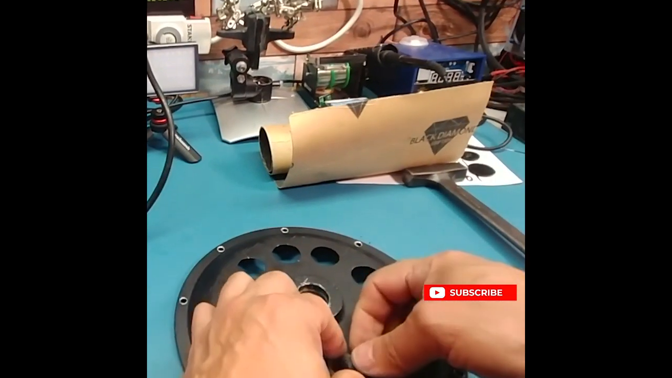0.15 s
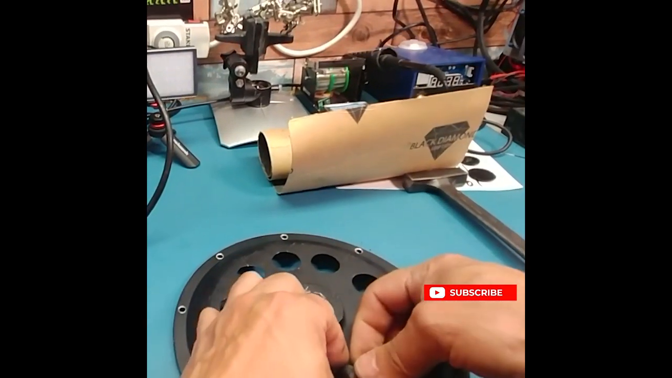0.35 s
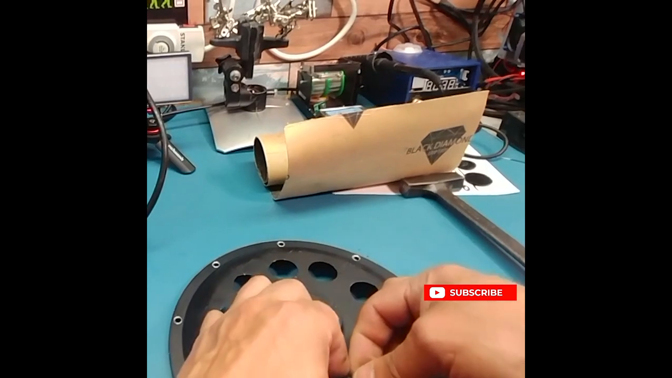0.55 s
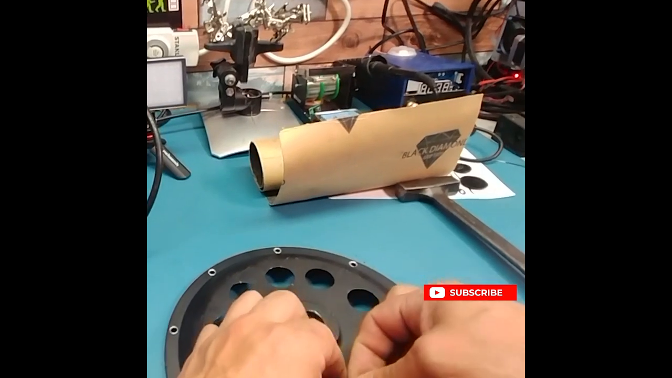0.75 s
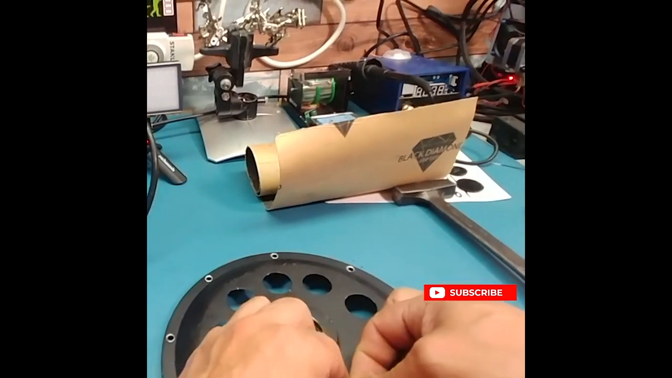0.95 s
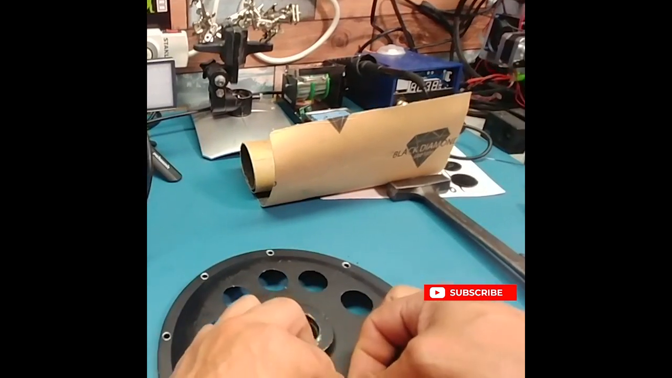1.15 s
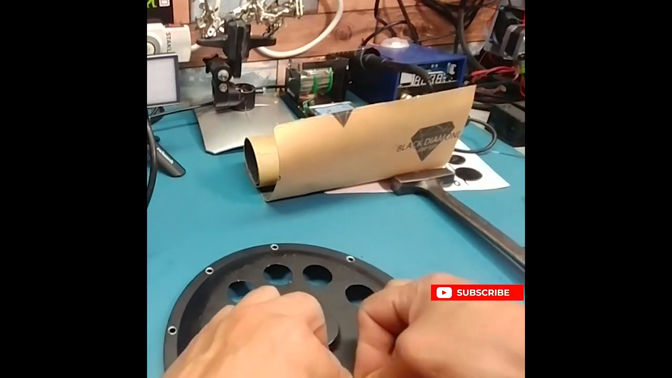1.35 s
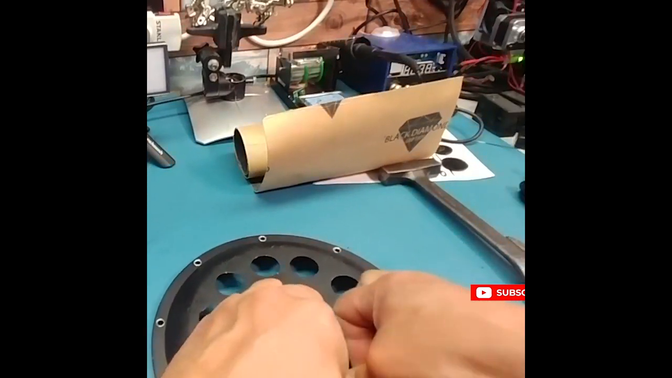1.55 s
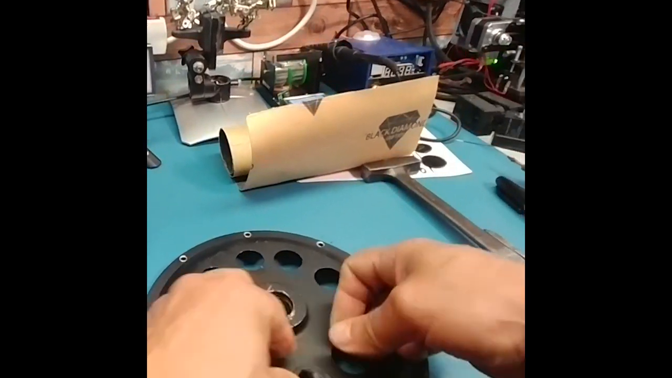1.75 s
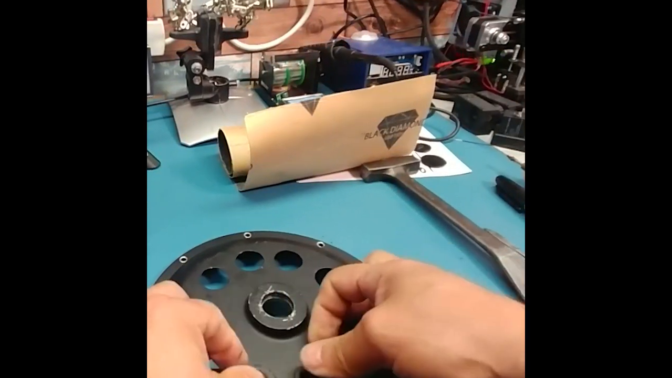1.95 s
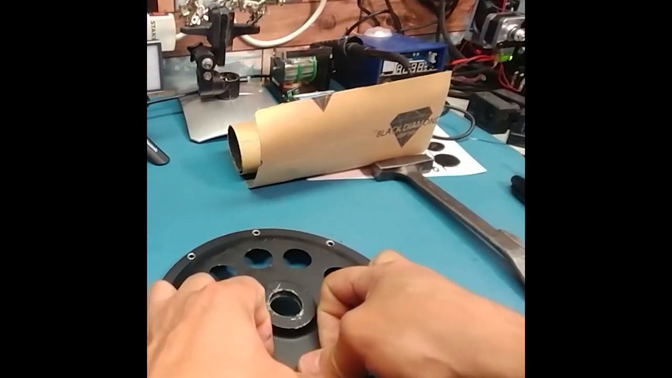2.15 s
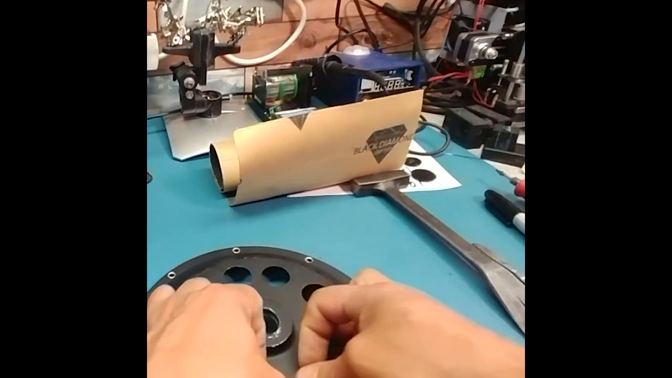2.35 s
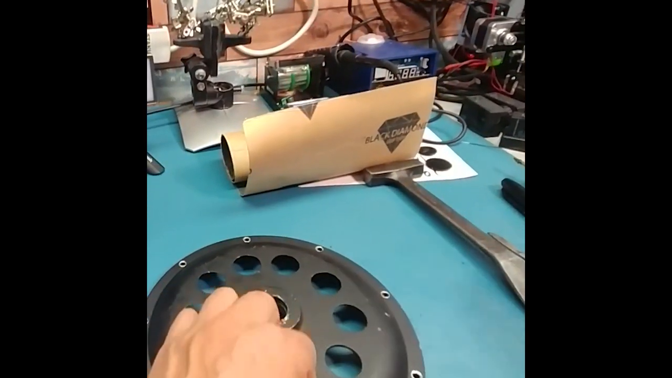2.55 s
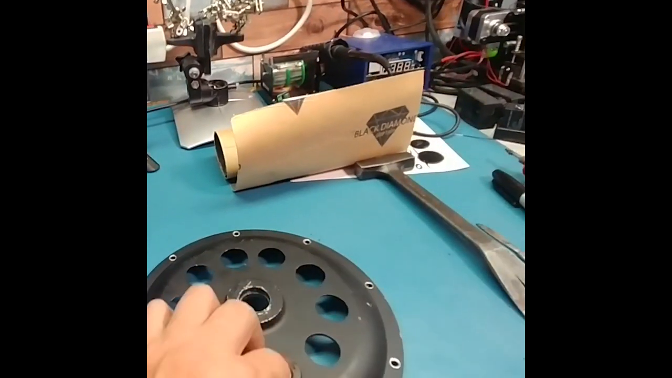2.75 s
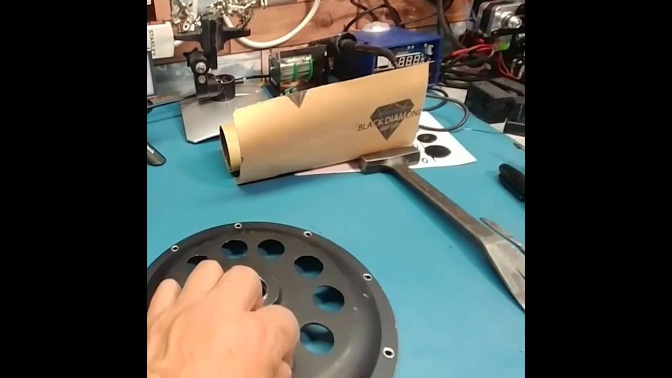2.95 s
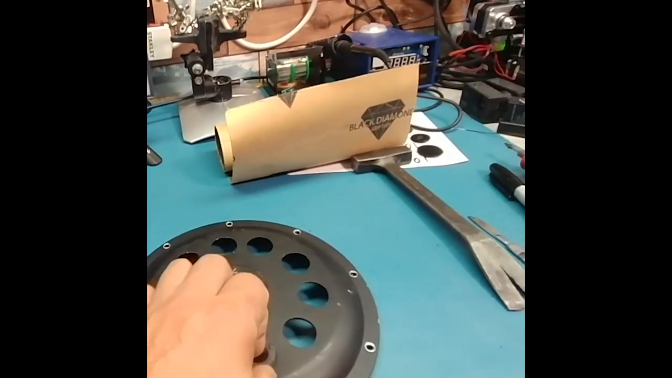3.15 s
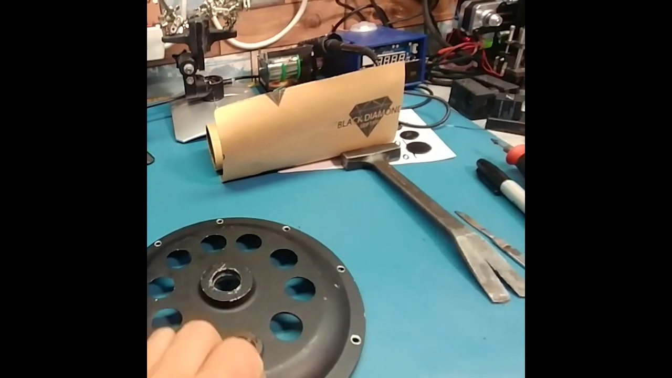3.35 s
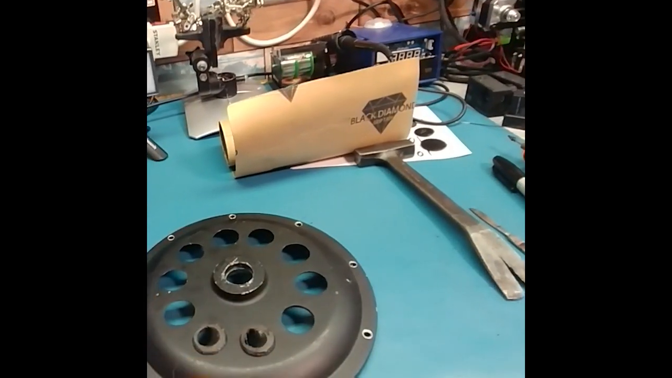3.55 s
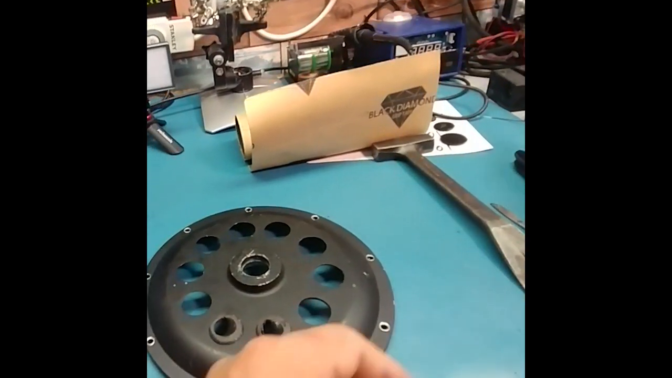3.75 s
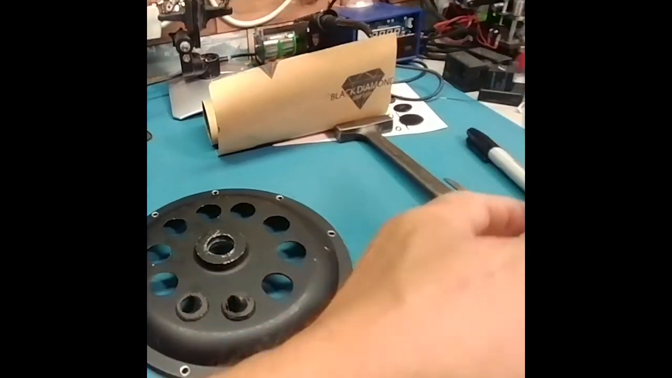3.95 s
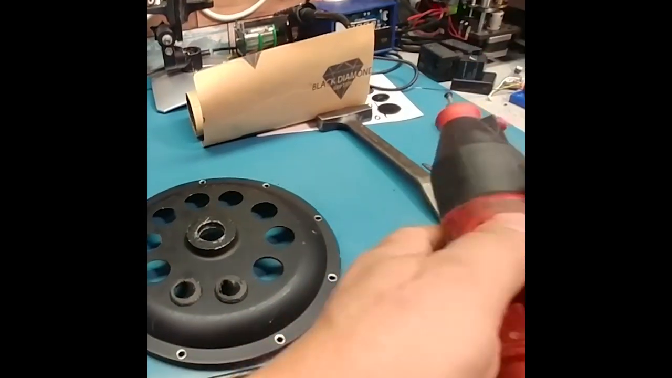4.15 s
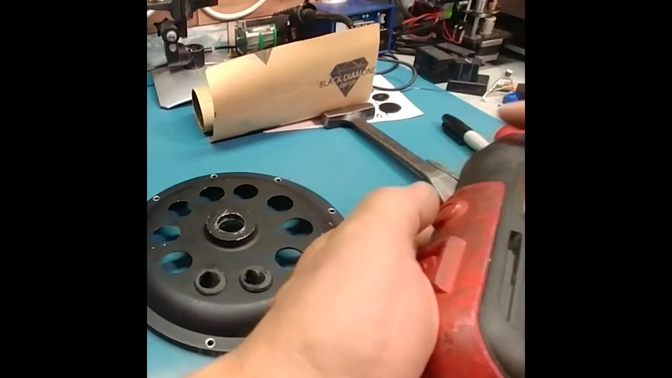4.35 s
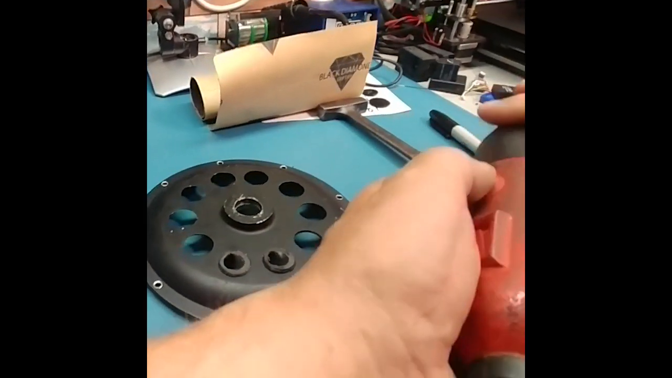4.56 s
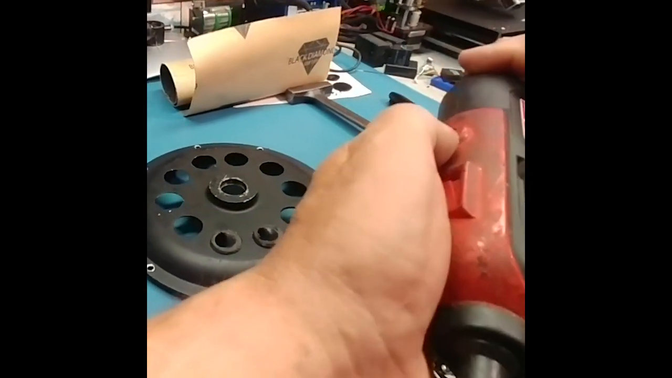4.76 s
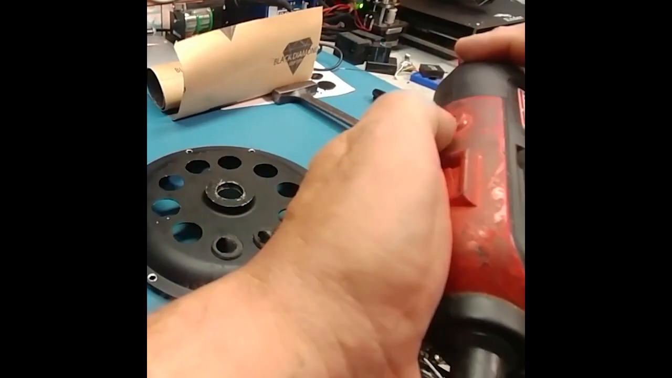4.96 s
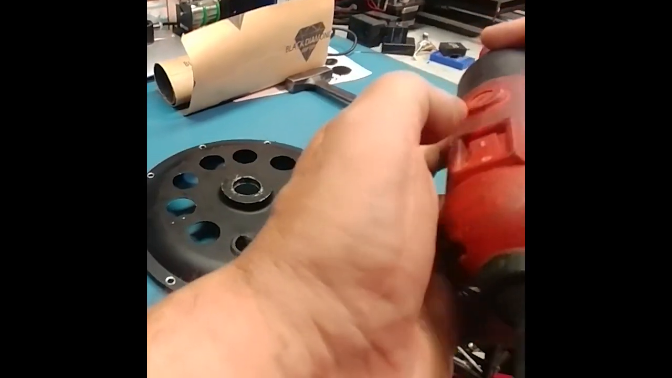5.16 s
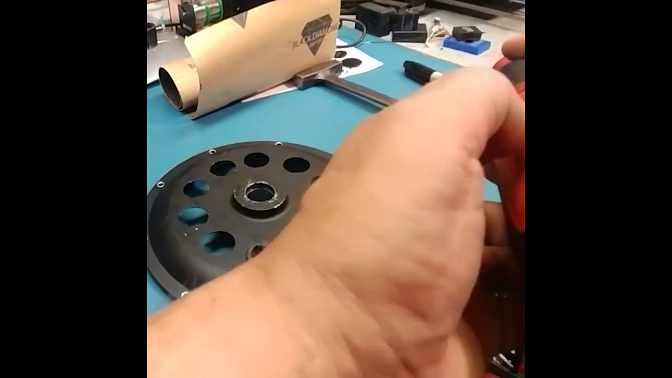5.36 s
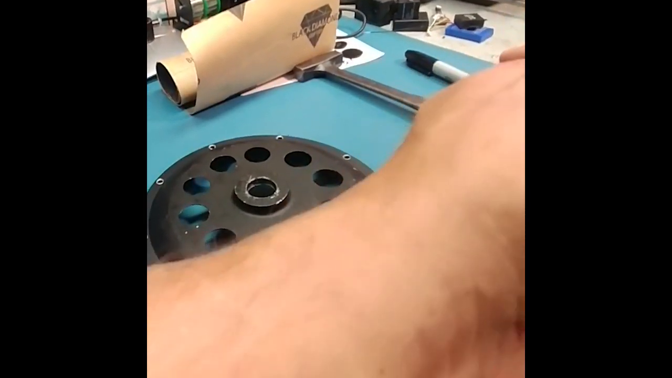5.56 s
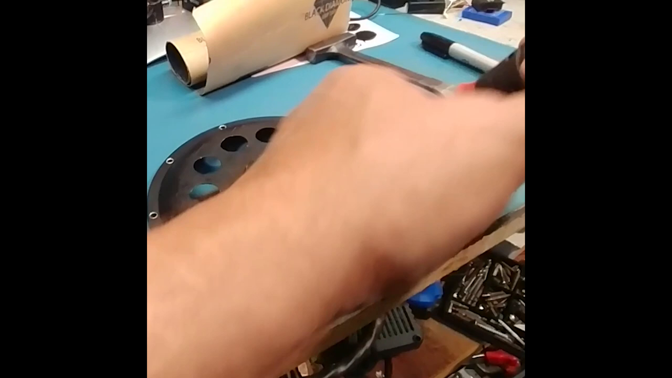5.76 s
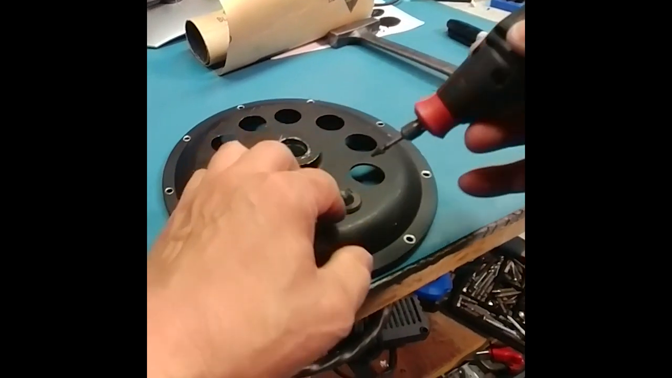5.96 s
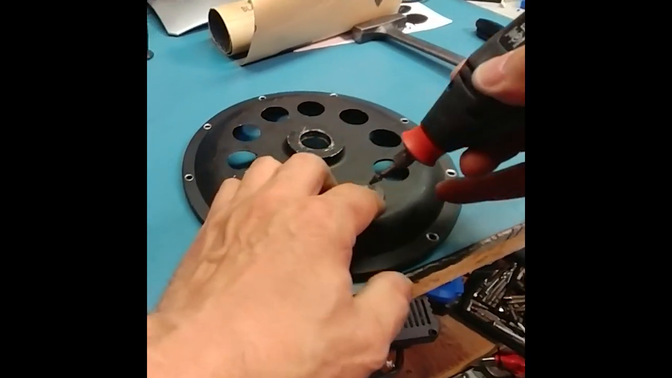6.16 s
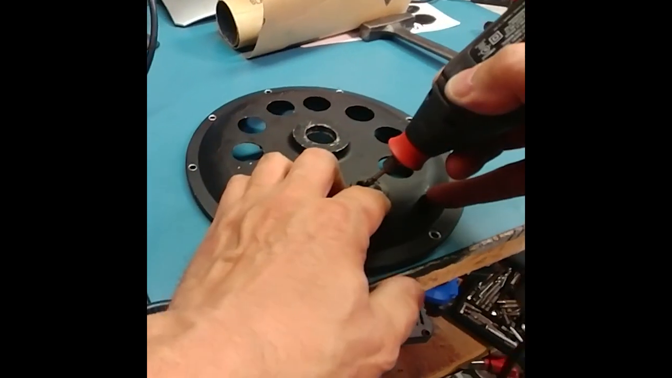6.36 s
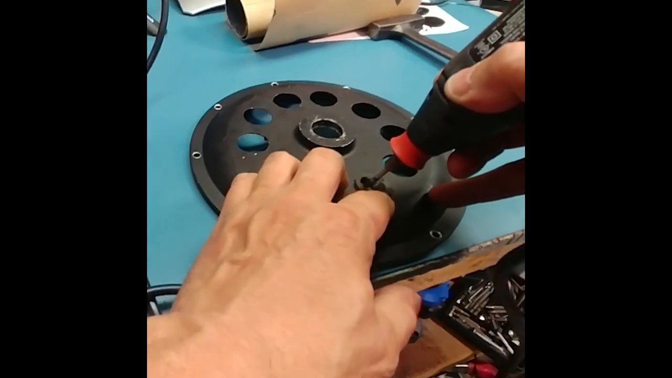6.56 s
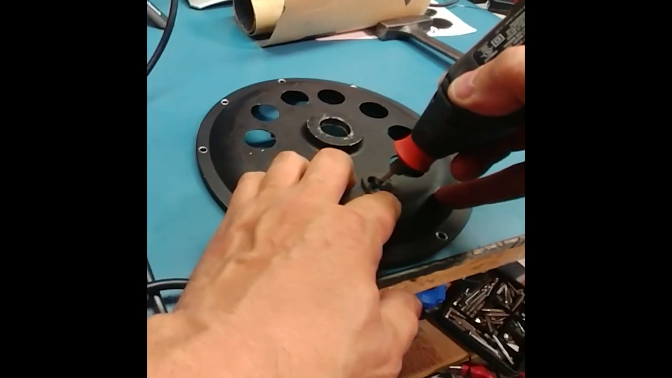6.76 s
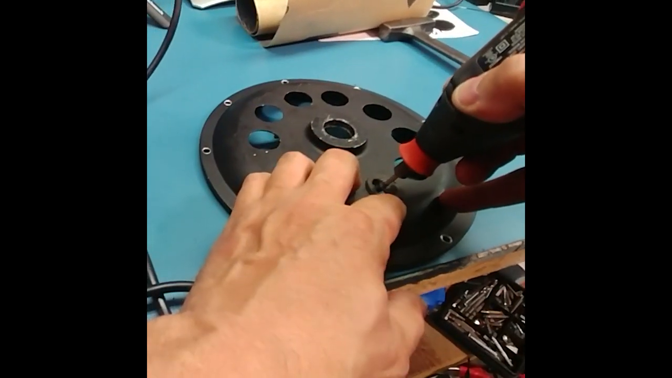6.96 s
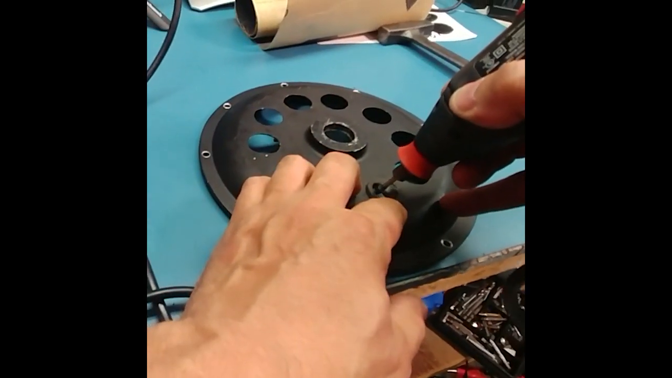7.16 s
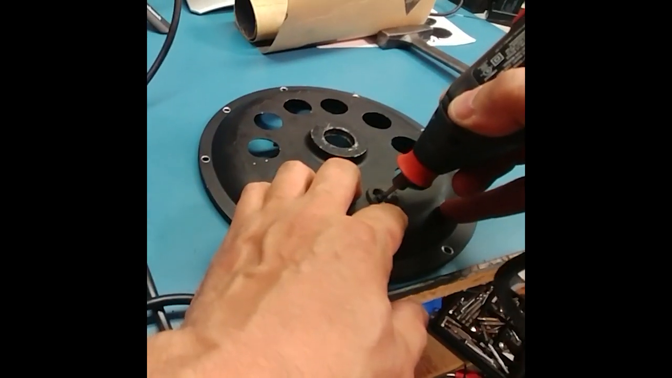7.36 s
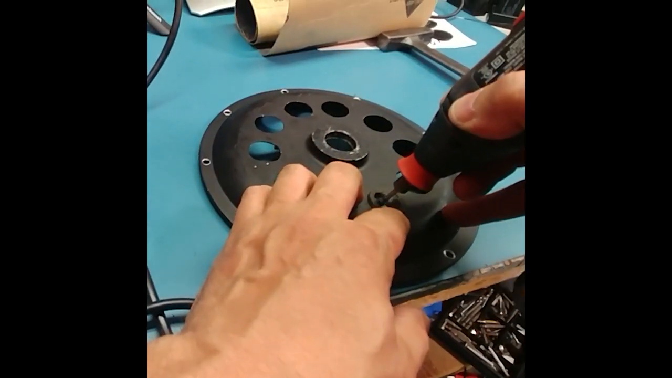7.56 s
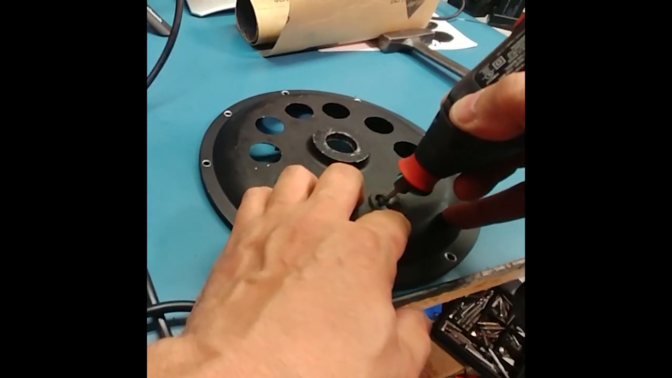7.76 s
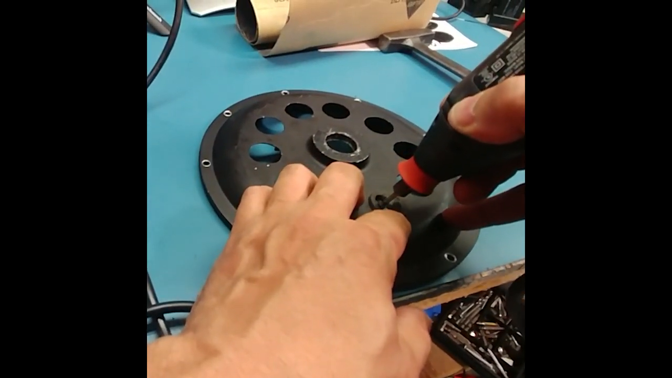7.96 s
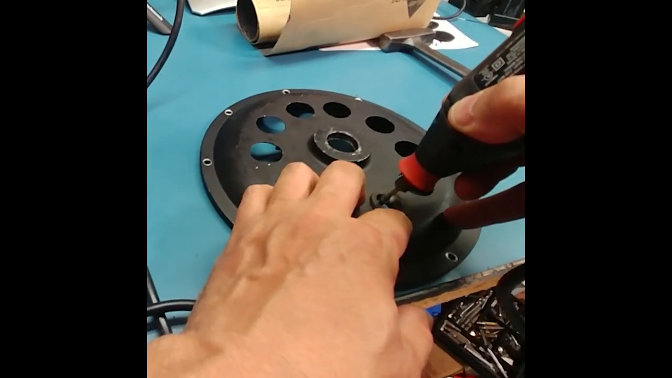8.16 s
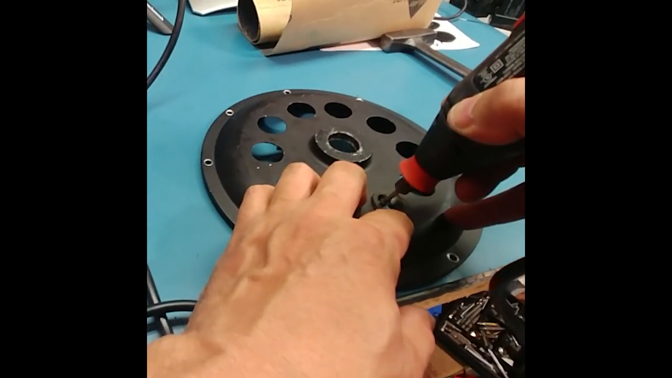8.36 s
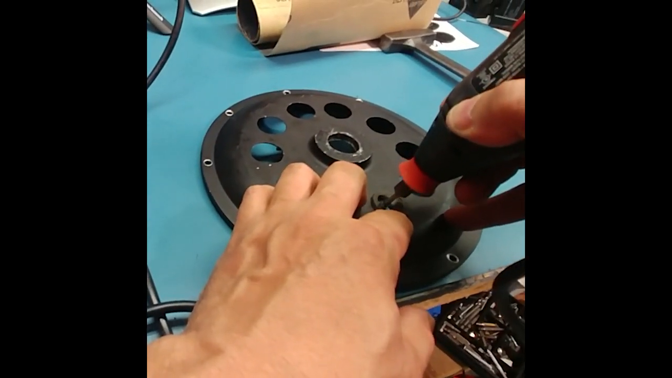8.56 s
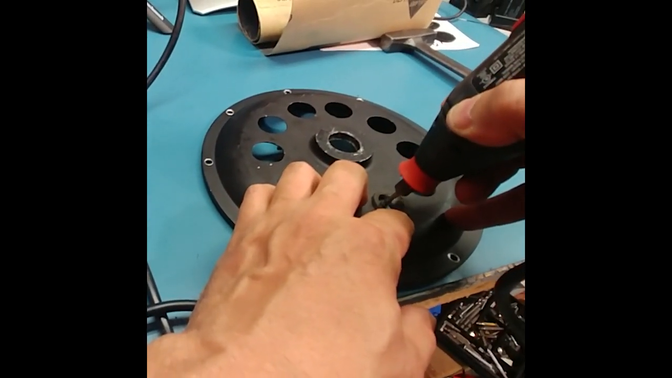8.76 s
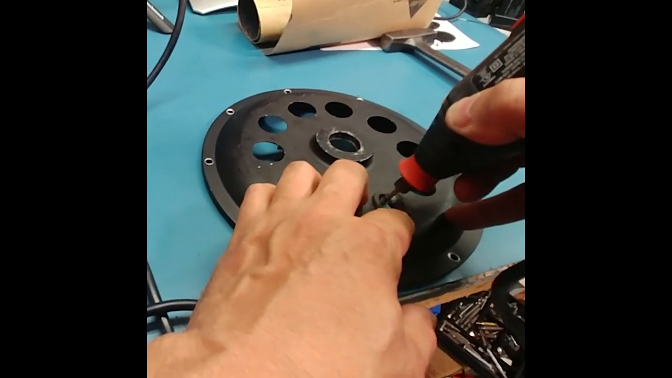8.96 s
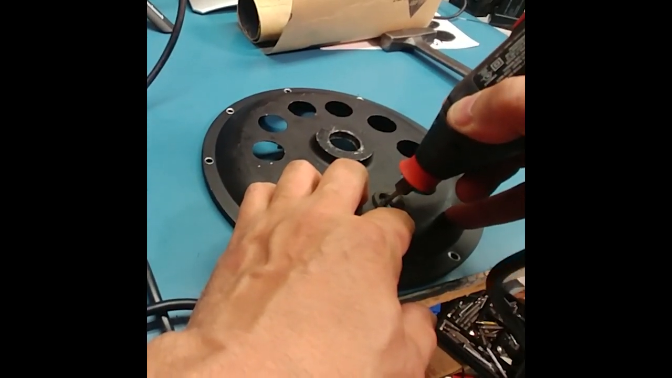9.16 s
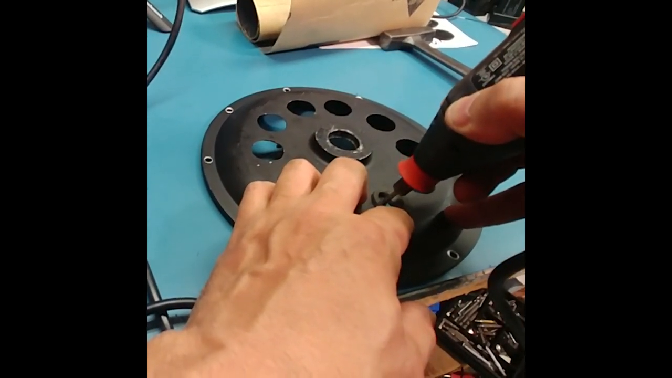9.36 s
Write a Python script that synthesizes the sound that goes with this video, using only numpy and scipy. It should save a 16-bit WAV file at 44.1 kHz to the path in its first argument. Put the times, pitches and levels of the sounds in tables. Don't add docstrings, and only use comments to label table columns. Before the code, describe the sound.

A small workshop hums softly with low ventilation, and a power supply whistles thinly and steadily. Close by, fingers scuff a plastic disc from the start; light knocks come at 0.8 s, firmer ones with dull bench bumps at 1.1-1.3 s, and a very loud cracking snap with a short rattle at 1.55 s. Brighter rubs and smaller knocks gather at 2.2-3.2 s, then a palm thud at 3.3 s, a faint tap near 3.65 s and sparse brushing until 5.2 s. A bump at 5.4 s precedes a sharp switch click at 5.5 s. The rotary tool whirs up steeply, with a low cable thump near 5.8 s, slowing its climb by 7 s into a loud, steady, throbbing whine full of fan air. The bit touches briefly at 6.7 s, then from 7 s grates and sings in irregular bites, still running at the end, about 9.4 s.

```python
import sys
import numpy as np
from scipy import signal
from scipy.fft import rfft, irfft, next_fast_len
from scipy.io import wavfile
from scipy.ndimage import uniform_filter1d, map_coordinates

SR = 44100
rng = np.random.default_rng(int(sys.argv[2]) if len(sys.argv) > 2 else 0)


def to_linear_factor(level_db):
    exponent = np.asarray(level_db, float) / 20
    return 10 ** exponent


def dump(signal):
    limited = np.clip(np.atleast_2d(signal).T, -1, 1)
    pcm = np.round(limited * 32767).astype(np.int16)
    wavfile.write(sys.argv[1], SR, pcm)


N = 414981
TIME = np.arange(N) / SR
BURST = TIME[:SR // 2]
MAINS = np.exp(2j * np.pi * 120 * TIME)
TOP_SPEED_HZ = 430
FINGERS_PAN_DB = 7


def level(x, db):
    return x * to_linear_factor(db) / np.sqrt(np.mean(x ** 2))


def noise(n=N):
    return rng.standard_normal(n)


def colour(x, points):
    hz, db = np.transpose(points)
    size = next_fast_len(len(x))
    f = np.fft.rfftfreq(size, 1 / SR)
    gain = to_linear_factor(np.interp(np.log(f + 1), np.log(hz), db))
    return irfft(rfft(x, size) * gain, size)[:len(x)]


def peak(x, hz, width_hz):
    return signal.lfilter(*signal.iirpeak(min(hz, .45 * SR), hz / width_hz, SR), x)


def walk(rate):
    k = int(SR / rate)
    steps = np.repeat(noise(N // k + 1), k)
    return 1.293 * uniform_filter1d(uniform_filter1d(steps, k), k)[:N]


def decay(t60_s):
    return to_linear_factor(-60 * BURST / t60_s)


def gate(start, end, edge_s):
    return np.clip(np.minimum(TIME - start, end - TIME) / edge_s, 0, 1)


def pan(x, db):
    return np.array([x * to_linear_factor(db / 2), x * to_linear_factor(-db / 2)])


def place(x, pan_db, lag):
    late = map_coordinates(x, [np.arange(N) - lag], order=3)
    return np.array([late * to_linear_factor(pan_db / 2), x * to_linear_factor(-pan_db / 2)])


def add(out, x, s):
    i = int(s * SR)
    out[:, i:i + x.shape[1]] += x


# f/Hz, level/dB per Hz
VENTILATION = [(25, -32.5), (50, -2.5), (150, 3), (185, -18), (275, 1.5), (430, -13), (800, -14.5),
               (1200, -25.5), (1700, -33), (2000, -47.5), (4500, -44.5), (7000, -64), (8300, -59),
               (9600, -85.5), (10800, -115)]
# f/Hz, width/Hz, level/dB
HUM_BANDS = [(59.5, 2.4, -44), (145.8, 13.3, -45.5), (236.5, 9.1, -52.5), (276, 4, -45.5)]


def workshop():
    def layer():
        air = level(colour(noise(), VENTILATION), -37.5)
        return air + sum(level(peak(noise(), f, width), db) for f, width, db in HUM_BANDS)

    mid = layer()
    side = colour(layer(), [(60, -13.0), (130, -13.5), (380, -9.5), (700, -0.5), (1300, 3)])
    return pan(1, 3.4)[:, None] * np.array([mid + side, mid - side]) * to_linear_factor(1.35 * walk(3.014))


# f/Hz, level/dB
WHISTLE_LINES = [(1130.5, -56.5), (2261, -78), (3394, -79), (4522, -78.5), (5655, -84), (6785, -99),
                 (7916, -82.5)]
# t/s, level/dB
WHISTLE_SHADING = [(0, -8.5), (2, -11), (2.8, -1.5), (3.8, -10), (4.2, -2), (5.5, 1)]


def supply_whistle():
    out = np.zeros((2, N))
    shading_db = np.interp(TIME, *np.transpose(WHISTLE_SHADING))
    for f, db in WHISTLE_LINES:
        line_db = db + 4.5 + 2.0 * walk(3.9) + (f < 1500) * shading_db
        line = np.sqrt(2) * to_linear_factor(line_db) * np.sin(2 * np.pi * f * TIME + 6 * rng.random())
        out += pan(line, 1.2 * walk(1))
    return out


# t/s, level/dB, length/s, brightness/dB per octave
SLIDES = [(0.061, -50, 0.15, -13.5), (0.794, -57, 0.071, 4), (.91, -69, .03, -3), (1.02, -67, 0.1, 3),
          (1.448, -65, 0.045, -3), (1.76, -69, 0.022, 1), (1.79, -56.5, 0.052, 10.5), (2.08, -68, .1, 0),
          (2.262, -43.5, 0.11, -13.5), (2.417, -40.5, 0.063, 11), (2.632, -55, 0.018, 1),
          (2.686, -69, .05, 3), (2.802, -47, 0.11, 8.5), (2.954, -51.5, 0.028, -1),
          (3.109, -52, 0.054, 13.5), (3.162, -49.5, 0.033, -6.5), (3.424, -59, 0.018, -3.5),
          (3.666, -67, .1, 0), (3.696, -57, 0.088, -14.5), (3.87, -60, 0.098, 6.5), (4.055, -57, 0.06, 6),
          (4.102, -57.5, 0.13, 7), (4.3, -53.5, 0.065, 9.5), (4.396, -46, 0.091, -12.5),
          (4.67, -64, .1, -10.5), (4.799, -64.5, 0.083, -4), (5.023, -50, 0.032, -10.5),
          (5.224, -54, 0.025, -8.5)]
# f/Hz, level/dB per Hz
SKIN = [(1000, -32), (3500, -15), (5300, -6.5), (6910, -17), (7980, 2), (9900, -27.5), (13500, -26),
        (15800, -22)]
# f/Hz, width/Hz, level/dB
DISC_RINGS = [(1500, 160, 5), (3520, 110, 11), (4350, 200, 6.5), (5730, 250, 1)]


def scuffs(out):
    for s, db, length, tilt_db in SLIDES:
        grain = noise(len(BURST)) * to_linear_factor(32. * uniform_filter1d(noise(len(BURST)), size=64))
        swell = np.sin(np.pi * np.clip(BURST / length, 0, 1) ** 0.45) ** 2
        tilted = [(f, d + tilt_db * np.log2(f / 8000)) for f, d in SKIN]
        rub = level(colour(grain, tilted), db)
        ring = sum(peak(peak(grain, f, width), f, width) for f, width, _ in DISC_RINGS[:2])
        add(out, pan((rub + level(ring, db - 21.5 + tilt_db)) * swell, FINGERS_PAN_DB), s)


# t/s, peak level/dB, body re crack/dB, rattle t60/s, left minus right/dB
DISC_KNOCKS = [(0.8135, -25, -12.5, 0.063, 5), (0.8544, -20, -22, 0.058, 8), (1.24, -15, -0.5, 0.024, 8),
               (1.3032, -35.5, 2, 0.034, 4), (1.5486, 11, -15, 0.083, 9), (1.562, -9.5, -5.5, 0.07, 2.5),
               (1.579, -9, 0, 0.059, 4.5), (2.2449, -24, 4, 0.03, 10), (2.2858, -45, 3, 0.08, 1.5),
               (2.3364, -51.5, 7, 0.08, 1.5), (3.6398, -35.5, 2.5, 0.09, -1.0)]
# f/Hz, level/dB per Hz
CRACK_COLOUR = [(530, -1), (900, -15.5), (1050, -8), (1660, -8), (2350, -26), (5310, -1.5), (6910, -13),
                (7980, 8.5), (9900, -26), (14200, -29), (15800, -34)]
# f/Hz, width/Hz, level/dB
BODY_MODES = [(170, 67, -13), (262, 130, -0.5), (380, 110, 9), (530, 80, 5.5), (850, 200, -5.5),
              (1526, 43, 1)]


def knocks(out):
    for s, db, body_db, t60, pan_db in DISC_KNOCKS:
        rattle = decay(0.012) + 0.26 * decay(max(t60, .01))
        crack = level(colour(noise(len(BURST)), CRACK_COLOUR), db - 18) * rattle
        push = noise(len(BURST)) * decay(max(2.0 * t60, .01))
        ring = sum(to_linear_factor(d) * peak(push, f, width) for f, width, d in BODY_MODES)
        ring *= to_linear_factor(-1.0 + body_db + db) / np.abs(ring).max()
        add(out, pan(crack + ring, pan_db), s)


# t/s, peak level/dB
BENCH_THUDS = [
    (1.106, -29),
    (1.241, -19),
    (1.303, -22),
    (2.246, -29),
    (3.337, -25.5),
    (3.736, -30),
    (5.43, -23),
]


def thuds(out):
    dull = signal.butter(3, 520, fs=SR)
    for s, db in BENCH_THUDS:
        push = signal.lfilter(*dull, noise(len(BURST)) * decay(0.073))
        thud = sum(peak(push, f, width) for f, width, _ in BODY_MODES[:4])
        add(out, pan(thud / np.abs(thud).max() * to_linear_factor(db), FINGERS_PAN_DB), s)


# t/s, peak level/dB
SWITCH_CLICKS = [
    (5.4971, -2.5),
    (5.504, -17),
    (5.567, -17),
]
# f/Hz, level/dB per Hz
CLICK_COLOUR = [(880, -85), (1500, -44), (3240, -14), (4180, -27.5), (6450, -3), (7190, -20), (8090, -0.5),
                (10100, -32), (14500, -27), (15800, -37.5)]


def switch(out):
    for s, db in SWITCH_CLICKS:
        click = level(colour(noise(len(BURST)), CLICK_COLOUR), db - 3.5) * decay(0.018)
        add(out, pan(click, 1.38), s)


def hands():
    out = np.zeros((2, N))
    for contact in (scuffs, knocks, thuds, switch):
        contact(out)
    return out + sum(to_linear_factor(db - 6.5) * peak(out, f, width) for f, width, db in DISC_RINGS)


# t/s, f/Hz (turns)
SHAFT_SPEED = [(5.52, 39.4), (5.59, 84.8), (5.69, 147.6), (5.8, 204), (5.87, 233.2), (5.98, 271.4),
               (6.1, 297), (6.19, 315.4), (6.39, 340.6), (6.55, 363), (6.78, 382.5), (7.01, 400.5),
               (7.32, 415.6), (7.69, 424.5), (8.62, 434.7), (8.83, 430.8), (9.28, 432.5), (9.41, 430)]


def spin():
    hz = np.interp(TIME, *np.transpose(SHAFT_SPEED))
    jitter_hz = 0.251 * walk(30) + 3.5 * walk(150) * np.clip(1.2 - hz / 200, 0, 1)
    return hz, 2 * np.pi * np.cumsum(uniform_filter1d(hz, size=4410) + jitter_hz) / SR


def tone(hz, turn, count, db, wobble_db):
    strength = np.sqrt(2) * to_linear_factor(db + wobble_db * walk(14)) * (count * hz < .4 * SR)
    return strength * np.exp(1j * (count * turn + 6 * rng.random()))


def pulsed(up, down):
    push = np.exp(up * MAINS - down / MAINS)
    return push / np.sqrt(uniform_filter1d(np.abs(push) ** 2, size=2205))


def throbbing_noise(turn):
    return noise() * (1 + 0.16 * MAINS.real + 0.17 * np.cos(turn))


# f/Hz, level/dB per Hz
FAN_AIR = [(760, -28), (1300, -4.5), (2150, -6), (3000, 2), (3740, -9.5), (4610, -8), (5220, -7),
           (7140, -6.5), (8180, 6), (9770, -18), (10500, -71.5), (11100, -13.5), (12700, -26.5),
           (15000, -11.5), (15800, -24)]


def fan_air(turn, air_db):
    return level(colour(throbbing_noise(turn), FAN_AIR), 0.74) * to_linear_factor(air_db + 1.6 * walk(10))


# f/Hz, level/dB per Hz
HOUSING_RUMBLE = [(88, -19.5), (150, -10.5), (390, -5), (427, -7.5), (511, -6.5), (846, -5), (916, -5),
                  (2200, -10), (2860, -51), (4840, -120)]
# multiple of turns, level/dB re rumble
SHAFT_TONES = [(2, -7), (3, -8), (4, -11), (5, -37), (6, -15), (7, 1)]


def rumble(hz, turn, octaves):
    housing = level(colour(throbbing_noise(turn), HOUSING_RUMBLE), -4.7)
    shaft = sum(tone(hz, turn, k, db, 1.2) for k, db in SHAFT_TONES)
    shaft = pulsed(0.37, 0.3) * shaft * np.clip(hz / 330, 0, 1) ** 3
    return (housing + shaft) * to_linear_factor(-7 + 6.5 * octaves + 1.3 * walk(5))


# multiple of turns, level/dB
ARMATURE_SLOTS = [(8, -10), (16, -16.5), (24, -13), (40, -15), (56, -20), (72, -13.5)]
# f/Hz, level/dB
SHELL_RADIATION = [(1800, -25.5), (2300, -4), (3400, -6), (4000, -13.5), (5800, -9), (8500, -1.5),
                   (10600, -34.5), (13500, -16)]
# f/Hz, width/Hz, level/dB
GRIP_RING = (2630, 167, 4.6)


def slot_whine(hz, turn, octaves, near_db):
    shell_hz, shell_db = np.transpose(SHELL_RADIATION)

    def slot(k, db, wobble_db):
        radiated_db = np.interp(np.log(k * hz), np.log(shell_hz), shell_db)
        return tone(hz, turn, round(k), db + near_db + 6.5 * octaves + radiated_db, wobble_db)

    lean = np.clip((hz - 350) / 70, -1, 1)
    whine = slot(*ARMATURE_SLOTS[0], 0.7) * pulsed(.8 - 0.75 * lean, -0.8 - 0.077 * lean)
    ring_hz, width_hz, ring_db = GRIP_RING
    whine = whine + to_linear_factor(ring_db) * peak(whine, ring_hz, width_hz)
    whine += pulsed(0.49, -0.08) * sum(slot(k, db, 1.5) for k, db in ARMATURE_SLOTS[1:])
    return whine * np.clip(hz / 152, 0, 1) ** 4


# multiple of turns, level/dB re air
BRUSH_TICKS = [(18, -7.5), (19, -25.5), (20, -26), (32, -29)]


def brush_ticks(hz, turn, air_db):
    ticks = sum(tone(hz, turn, k, db + air_db - 13.5, 5.0) * np.clip(k * hz / 7500, 0, 1) ** 3
                for k, db in BRUSH_TICKS)
    return pulsed(.4, 0.48) * ticks


# multiple of the mains pulse, level/dB running up, level/dB at speed
MAINS_BUZZ = [(2, -39, -35.5), (3, -41, -51.5), (4, -39.5, -44.5)]


def mains_buzz(hz):
    buzz = sum(to_linear_factor(np.interp(hz, (380, 420), db) + 0.98 * walk(6)) * MAINS ** k for k, *db in MAINS_BUZZ)
    return buzz * np.clip(hz / 230, 0, 1) ** 4


# start t/s, end t/s, f/Hz, level/dB
CABLE = (5.75, 5.95, 66, -31)


def cable_drag():
    start, end, hz, db = CABLE
    return gate(start, end, 0.011) * level(peak(peak(noise(), hz, 70.), hz, 70.), db)


# start t/s, end t/s, grit level/dB, multiple of turns that sings, its level/dB
BIT_TOUCHES = [(7.054, 9.6, -20.5, 9, -57), (6.69, 6.86, -15.5, 4, -16.5), (6.69, 6.725, -18.5, 12, -19),
               (6.993, 7.045, -16, 9, -35), (7.202, 7.42, -19.5, 4, -33), (7.565, 7.63, -12, 12, -23),
               (7.717, 7.98, -14, 12, -26.5), (7.73, 7.896, -30.5, 10, -33.5),
               (7.98, 8.176, -26, 12, -29.5), (8.288, 8.316, -11.5, 12, -29),
               (8.464, 8.577, -17.5, 12, -24.5), (8.603, 8.7, -19.5, 13, -21),
               (8.747, 8.87, -19, 13, -23.5), (8.95, 9.04, -17.5, 13, -27.5), (9.11, 9.188, -15, 12, -25.5),
               (9.254, 9.41, -16.5, 13, -41.5)]
# f/Hz, width/Hz, level/dB
DISC_MODES = [(1400, 230, 9), (3885, 600, 8), (5110, 360, 1), (5770, 300, -8), (6600, 2800, 0.5),
              (8330, 2600, -5), (11300, 1500, -1), (14250, 20000, 1)]
# multiple of turns, level/dB re grit, upper mains side line (0-1.5)
BIT_LOBES = [(4, -22.5, 0.1), (9, -20, 0), (10, -21.5, 0.15), (12, -37, 0), (13, -20.5, 0.74), (22, -16, 0)]


def bite(hz, turn):
    scrape = noise() * np.exp(1.07 * np.cos(turn)) * to_linear_factor(1.1 * walk(60))
    grit = level(sum(to_linear_factor(db) * peak(scrape, f, width) for f, width, db in DISC_MODES), 0)
    lobes = {round(k): np.real(tone(hz, turn, round(k), 0, 2.0) * pulsed(up, 0.073))
             for k, _, up in BIT_LOBES}
    stirred = sum(to_linear_factor(db) * lobes[round(k)] for k, db, _ in BIT_LOBES)
    out = tone(hz, turn, 1, -37, 2.5).real * gate(7.3, 99, 0.37)
    for start, end, grit_db, k, song_db in BIT_TOUCHES:
        nearest = min(lobes, key=lambda m: abs(m - k))
        song = to_linear_factor(grit_db) * stirred + to_linear_factor(song_db) * lobes[nearest]
        first = 1 + 1.1 * np.exp(-np.maximum(TIME - start, 0) / 0.011)
        contact = gate(start, end + 0.06, 0.0077) * gate(0, end + 0.03, 0.064)
        out = out + contact * (to_linear_factor(grit_db - 5.0) * grit * first + song)
    return out


# t/s, samples late at the left port, left minus right/dB, nearness level/dB
TOOL_SWING = [
    (5.5, 13.1, -6.5, 10),
    (5.8, 12, -1, 1.5),
    (6.1, 11.44, -4.5, 0.5),
    (6.35, 10.7, -0.5, 1),
    (6.6, 10.54, 0, 0.5),
    (7.0, 8.45, 1.5, 0),
    (7.4, 8.4, 3.5, -1),
    (7.8, 8.5, 2, -1.27),
]


def tool():
    hz, turn = spin()
    octaves = np.log2(hz / TOP_SPEED_HZ)
    s, *columns = np.transpose(TOOL_SWING)
    lag, pan_db, near_db = (np.interp(TIME, s, c) for c in columns)
    air_db = -16.5 + 9 * octaves + near_db + 0.27 * walk(4)
    body = slot_whine(hz, turn, octaves, near_db) + brush_ticks(hz, turn, air_db)
    body = np.real(body + rumble(hz, turn, octaves) * to_linear_factor(air_db) + mains_buzz(hz))
    ports = place(body + fan_air(turn, air_db), pan_db, lag)
    ports += place(fan_air(turn, air_db), pan_db, lag - 3.0)
    ports += place(bite(hz, turn), 1.5, 9.56)
    return ports * gate(5.5, 99, 0.02)


def room(x, wet_db):
    t = TIME[:SR // 3]
    mid, side = rng.standard_normal((2, len(t))) * to_linear_factor(-60 * t / 0.21) * np.clip(t / 0.0044 - .5, 0, 1)
    side = signal.lfilter(*signal.butter(1, 500, "high", fs=SR), side)
    echo = np.array([mid + side, mid - side]) / np.sqrt(2 * np.sum(mid ** 2))
    return x + to_linear_factor(wet_db) * signal.fftconvolve(x.mean(axis=0, keepdims=True), echo, axes=1)[:, :N]


def scene():
    background = workshop() + supply_whistle()
    bench = room((hands() + cable_drag()) * to_linear_factor(-0.5), -4.0)
    return background + bench + room(tool() * to_linear_factor(1.11), -6.5)


def low_pass(x):
    return signal.sosfilt(signal.butter(12, 15820, fs=SR, output="sos"), x)


def record(dry):
    mix = np.clip(dry, -1, 1)
    return low_pass(mix)


dry = scene()
out = record(dry)
dump(out)
```